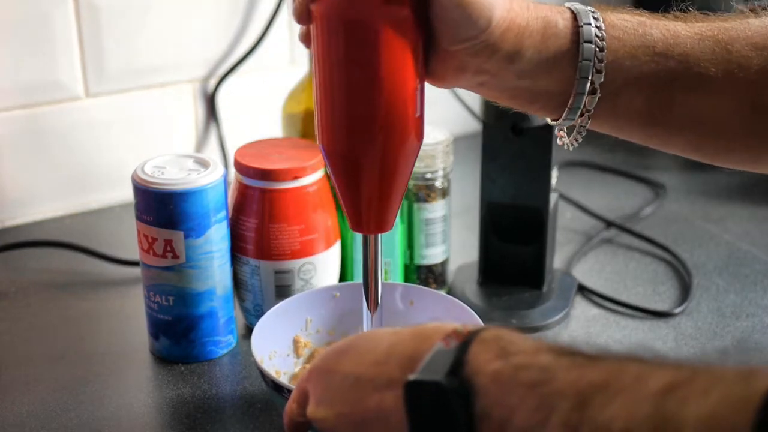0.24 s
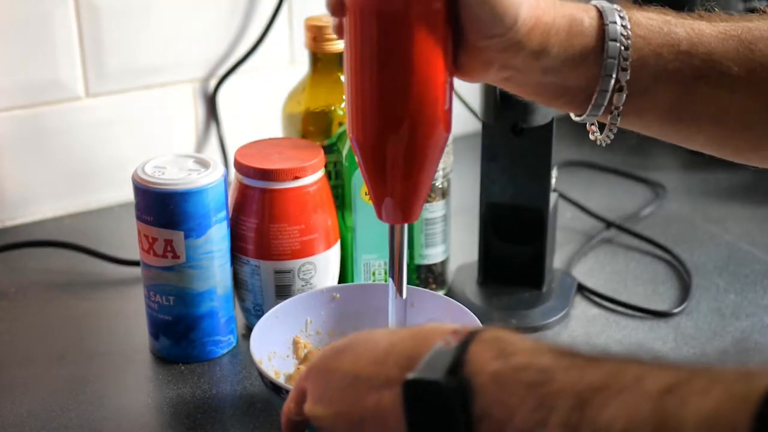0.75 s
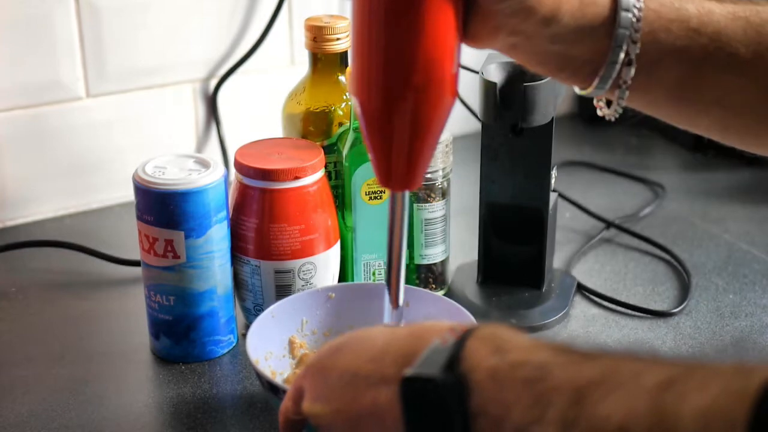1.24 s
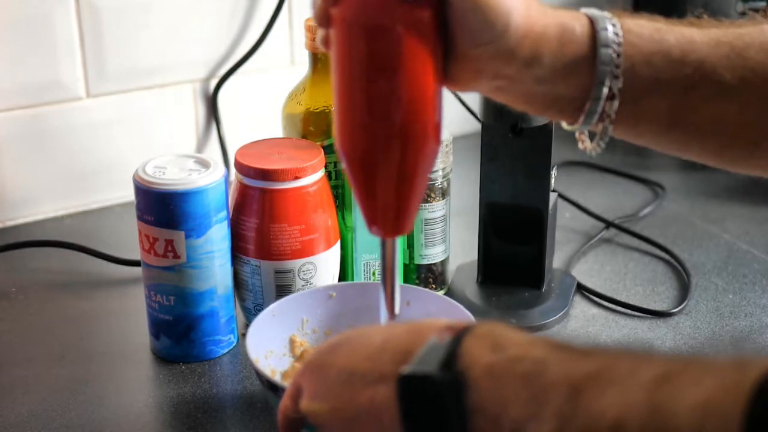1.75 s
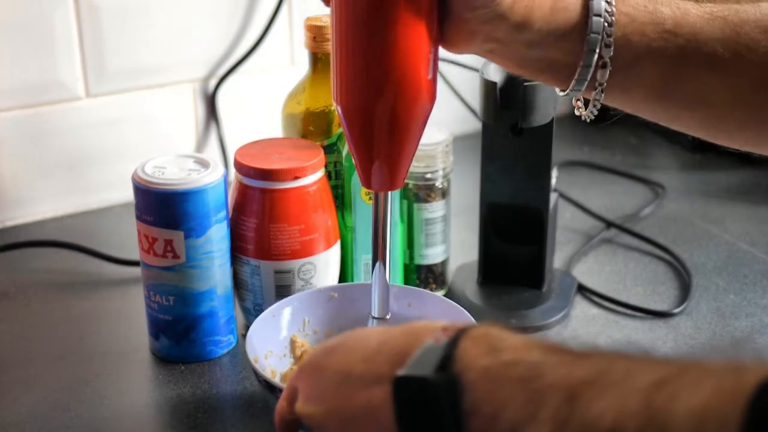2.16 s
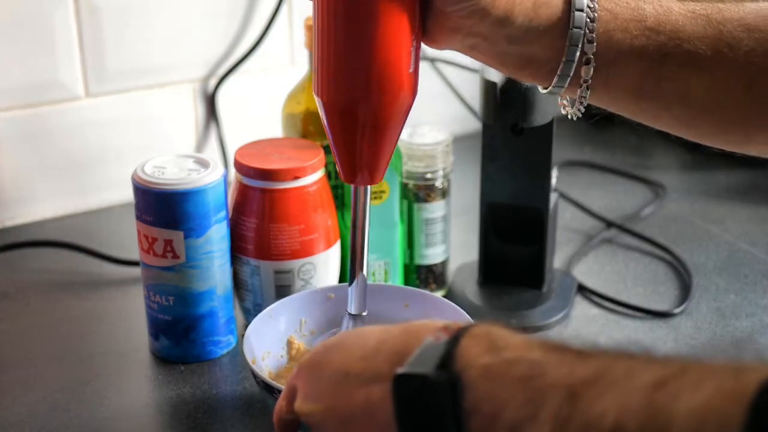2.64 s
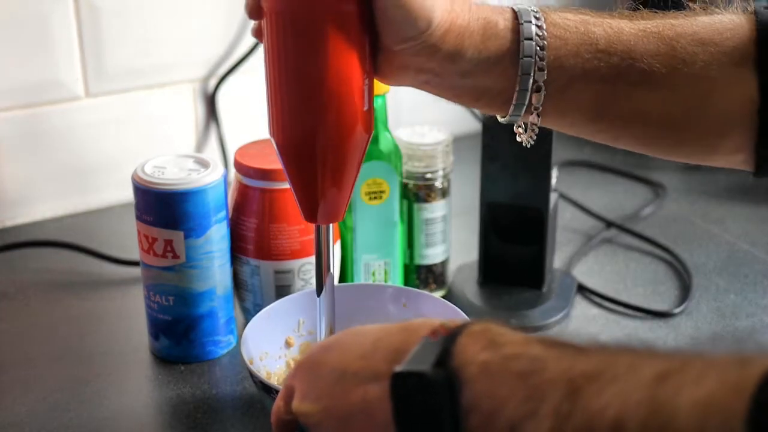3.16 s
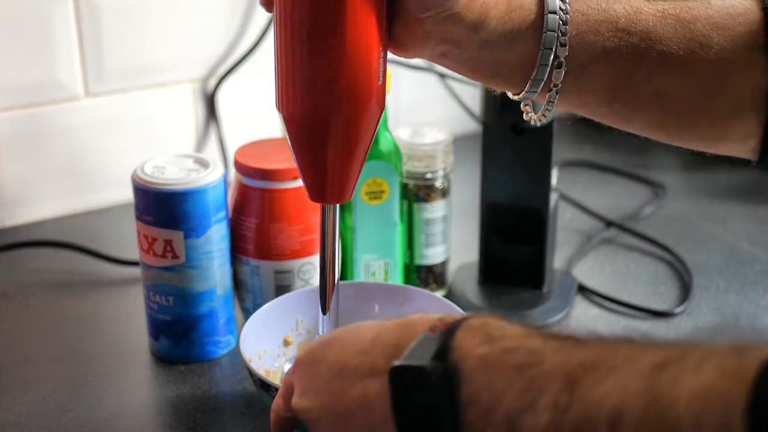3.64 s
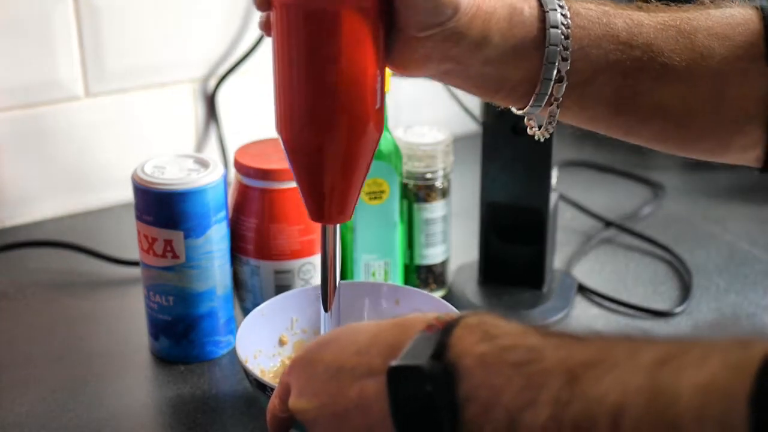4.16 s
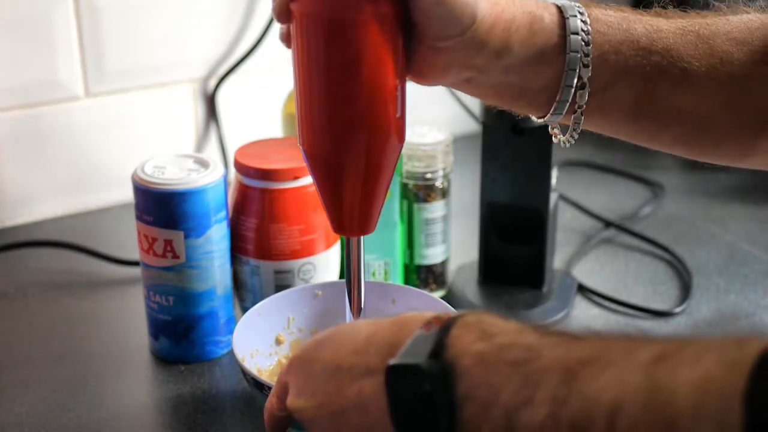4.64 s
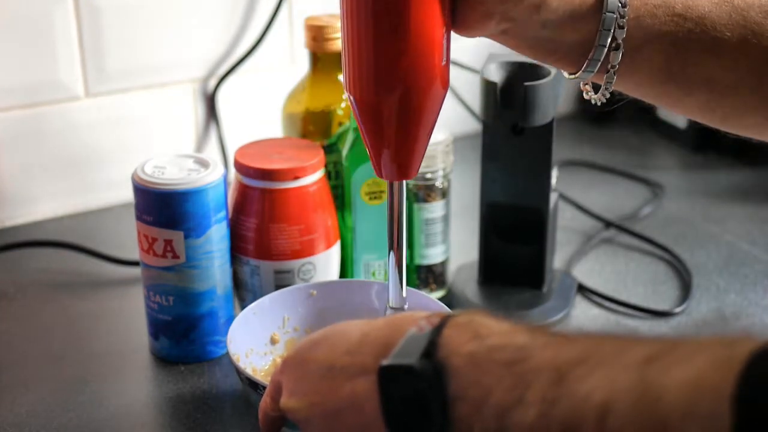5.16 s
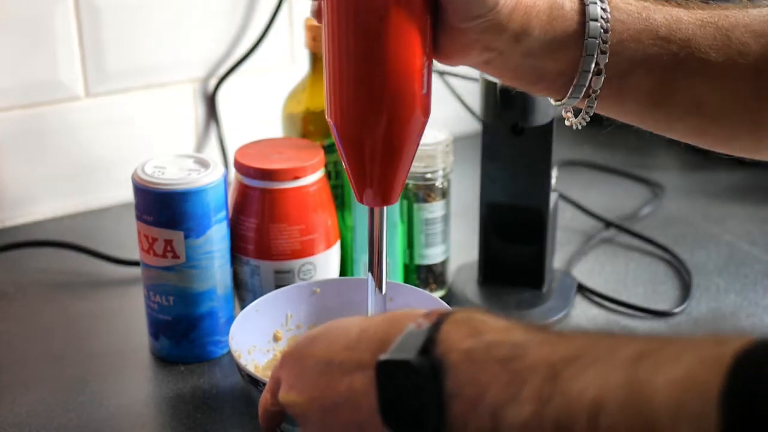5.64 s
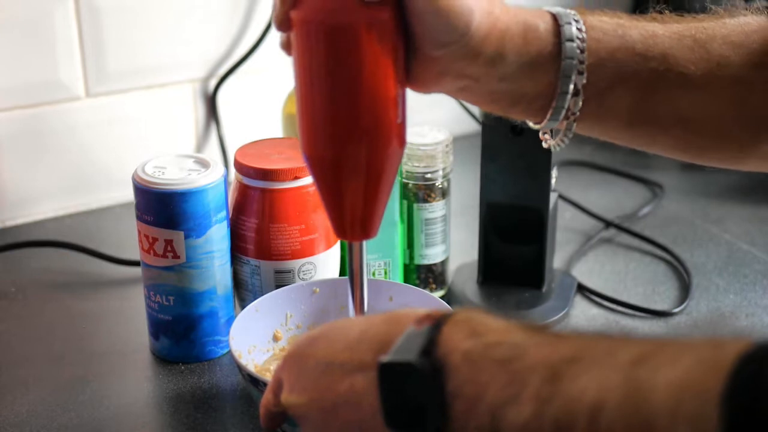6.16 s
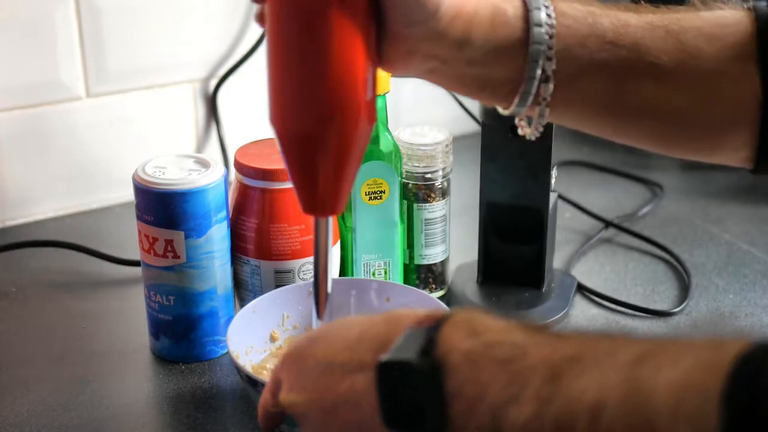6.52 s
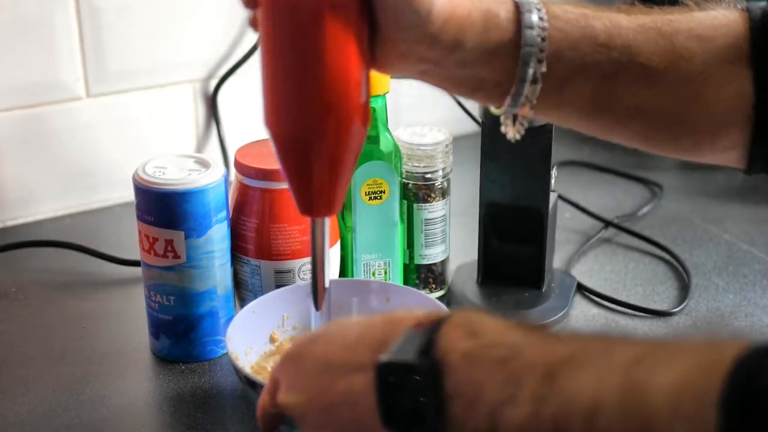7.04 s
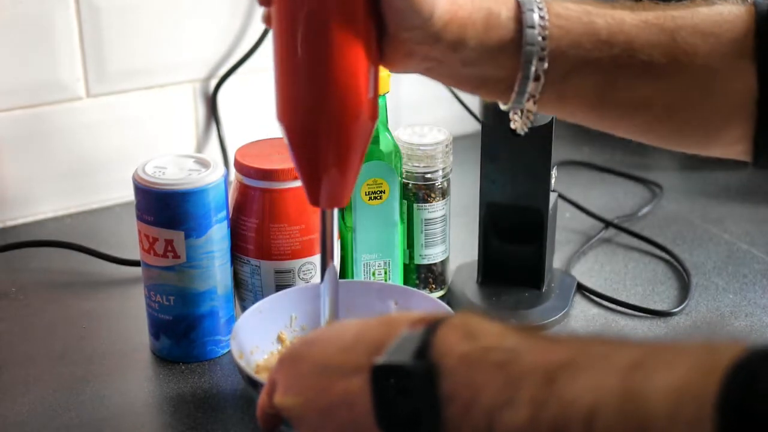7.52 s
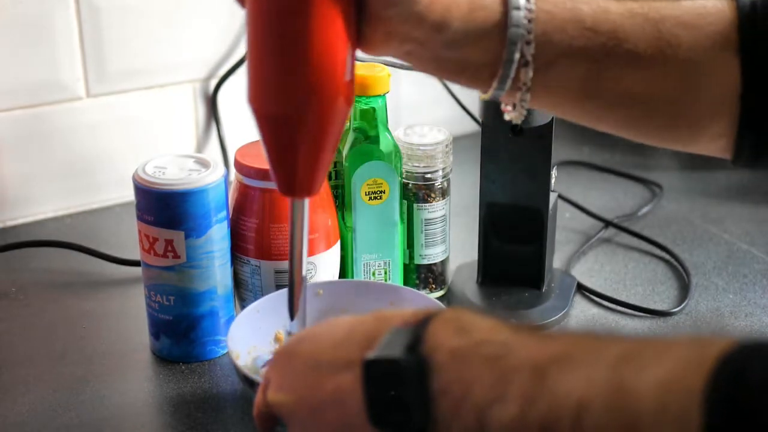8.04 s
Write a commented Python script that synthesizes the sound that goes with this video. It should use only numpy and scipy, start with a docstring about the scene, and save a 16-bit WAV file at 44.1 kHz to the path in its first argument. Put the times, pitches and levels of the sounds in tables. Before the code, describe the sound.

A hand blender's steel foot, motor silent, scrapes and crushes dry crumbs round a bowl in rhythmic strokes, with hollow knocks and judders.

```python
"""A tiled kitchen, ringing briefly: a hand blender's steel foot is worked round a bowl of dry crumbs.
About one stroke every three quarters of a second. Pressed down it crushes crumbs and makes the bowl judder;
eased off it slides with a bright rasp. Friction is random grains over smooth noise, coloured by the bowl.
Wall knocks, worktop thuds and snapping crumbs are clicks with noise tails; knocks also ring decaying sines.
Now and then the rub sings: a gliding narrow-band tone."""
import sys
import numpy as np
from scipy import signal
from scipy.fft import rfft, irfft
from scipy.io import wavfile
from scipy.ndimage import uniform_filter1d

SR = 44100
rng = np.random.default_rng(int(sys.argv[2]) if len(sys.argv) > 2 else 0)


def generate_wav(signal):
    """Clip the signal to [-1, 1] and save it as 16-bit WAV at the path in sys.argv[1]."""
    frames = np.transpose(np.atleast_2d(signal))
    scaled = np.clip(frames, -1, 1) * 32767
    pcm = np.round(scaled).astype(np.int16)
    wavfile.write(sys.argv[1], SR, pcm)


N = 365148


def from_db(db):
    """Decibels to amplitude gain."""
    return np.exp(np.log(10) / 20 * np.asarray(db))


def rms_one(x):
    """Scale a signal to unit power."""
    return x / np.sqrt(np.mean(x ** 2) + 1e-20)


def in_time(power):
    """Power per millisecond to dB per sample."""
    return np.interp(np.arange(N) / SR, np.arange(len(power)) * .001, 10 * np.log10(power + 1e-12))


def at_hz(points, hz):
    """Interpolate a curve on a log-frequency axis."""
    point_hz, value = np.transpose(points)
    return np.interp(np.log(hz), np.log(point_hz), value)


def drift(rate_hz, count=N):
    """Slow random signal of unit rms: two-pole lowpassed noise, computed every 40 samples."""
    step, settle = 40, 2000
    pole = np.exp(-2 * np.pi * rate_hz * step / SR)
    noise = rng.standard_normal(count // step + settle + 2)
    slow = signal.lfilter([1], [1, -2 * pole, pole ** 2], noise)[settle:]
    return np.interp(np.arange(count) / step, np.arange(len(slow)), rms_one(slow))


def through(x, response):
    """Convolve a signal with an impulse response."""
    return signal.oaconvolve(x, response)[:N]


# resonances of bowl, shaft and worktop, before the local mean is removed: centre_hz, width_hz, lift_db
BODY_MODES = [(165, 38, 5), (235.7, 19.6, 9), (381.5, 46, 7.5), (503, 190, 5), (583, 90, 5),
              (613, 9.9, 6.5), (642, 2.9, 11.5), (739.5, 66, 8.5), (856, 32, 7.5), (933, 21, 10),
              (1023, 93, 7.5), (1065, 11, 8), (1137, 31, 5), (1226, 9.4, 11), (1221.6, 10.3, -14.5),
              (1367, 17, 0.5), (1445, 9.8, 3), (1687, 44, 7), (1828, 41, 8.5), (2000, 540, 28),
              (2410, 11.3, -13), (2800, 43, -2.5), (2820, 18, 8.5), (4050, 26.2, 2.5), (3940, 82, 6),
              (4250, 45, 5)]


def bowl_response(spectrum):
    """Minimum-phase, unit-energy response: a broad colour with steep ends, carved by the bowl's resonances."""
    size = 2 ** 13
    hz = np.maximum(np.arange(size // 2 + 1) * SR / size, 1)
    lift_db = sum(db / (1 + (2 * (hz - f) / width) ** 2) for f, width, db in BODY_MODES)
    lift_db = lift_db - uniform_filter1d(lift_db, size=71)  # valleys between peaks
    octaves_below = np.maximum(np.log2(spectrum[0][0] / hz), 0)
    octaves_above = np.maximum(np.log2(hz / spectrum[-1][0]), 0)
    end_loss_db = 18 * np.minimum(octaves_below + octaves_above, 3)
    level_db = at_hz(spectrum, hz) + lift_db - end_loss_db
    # folding the cepstrum makes the response causal
    cepstrum = irfft(np.log(from_db(level_db)))
    cepstrum[1:size // 2] *= 2
    cepstrum[size // 2 + 1:] = 0
    response = irfft(np.exp(rfft(cepstrum)))
    return response / np.linalg.norm(response)


# relative colour of the room tone: freq_hz, density_db_per_hz
ROOM_COLOUR = [(18, -42), (30, 3), (288, -13), (472, -34), (1520, -24), (1690, -36), (3230, -15),
               (7830, -15), (15000, -16)]


def room_tone():
    """Quiet of the kitchen: steady coloured noise, independent in mid and side."""
    level_db = -68.5
    response = bowl_response(ROOM_COLOUR)
    noise = rng.standard_normal((2, N))
    return from_db(level_db) * np.array([through(part, response) for part in noise])


def dying_noise(t60_s):
    """Dense reflections of unit energy that build up within a few milliseconds, then decay."""
    t = np.arange(SR // 2) / SR
    tail = rng.standard_normal(len(t)) * from_db(-60 * t / t60_s) * (1 - np.exp(-t / 0.0021))
    return tail / np.linalg.norm(tail)


def blows(rows, spectrum, rattle_db, rattle_t60_s, room_db):
    """Mid and side of contacts: a click, near reflections and the room, lowpassed if the contact is soft."""
    kitchen_t60_s = 0.39
    response = bowl_response(spectrum)
    force = np.zeros((2, N + SR))
    for start_s, level_db, *dull_hz in rows:
        hit = np.array([from_db(rattle_db) * dying_noise(rattle_t60_s)
                        + from_db(room_db) * dying_noise(kitchen_t60_s) for _ in range(2)])
        hit[0, 0] += 1  # click, mid only
        if dull_hz:
            lowpass = signal.butter(2, min(dull_hz[0], SR / 3), fs=SR, output="sos")
            hit = signal.sosfilt(lowpass, hit)
        at = round(start_s * SR)
        force[:, at:at + hit.shape[1]] += from_db(level_db) * hit
    peak_one = response / np.abs(response).max()
    return np.array([through(part, peak_one) for part in force])


# bowl rocking on the worktop: start_s, level_db
THUD_EVENTS = [(.450, -34.5), (2.378, -16.5), (3.119, -10.5), (3.135, -21.5), (5.447, -10), (5.501, -13.5),
               (6.108, -16.5), (7.585, -6), (7.642, -11), (7.656, -9)]
# relative colour: freq_hz, density_db_per_hz
THUD_COLOUR = [(60, -23), (110, -19.5), (170, -3), (240, -5), (380, -8.5), (700, -29)]


def thuds():
    """The bowl rocks on the worktop: low-coloured blows."""
    return blows(THUD_EVENTS, THUD_COLOUR, rattle_db=-1, rattle_t60_s=0.21, room_db=-6.0)


# hard crumbs snapping: start_s, level_db
SNAP_EVENTS = [(3.8457, -21), (3.8812, -1.5), (3.8875, 0), (7.9005, -6.5)]
# relative colour: freq_hz, density_db_per_hz
SNAP_COLOUR = [(150, 10), (600, 2), (2000, 8.5), (4000, -0.5), (8000, -3), (13000, -18), (15500, -26)]


def snaps():
    """Hard crumbs snap: bright, undulled blows."""
    return blows(SNAP_EVENTS, SNAP_COLOUR, rattle_db=-0.5, rattle_t60_s=0.023, room_db=-1.5)


# foot against bowl wall: start_s, level_db (relative), dull_above_hz, ring_db (against level_db)
WALL_KNOCKS = [(0.443, -1.5, 1900, -35), (1.081, -9, 980, -20), (1.3861, -17, 670, -34),
               (1.509, -28, 2860, -20), (1.53, -17, 1970, -28), (2.6449, -2.5, 1595, -25.5),
               (2.898, -22.5, 460, -27), (2.983, -21, 1790, -30), (3.3803, -3.5, 1510, -24.5),
               (3.825, -28, 2200, -24), (3.8451, -18, 4540, -34), (4.44, -47, 3550, -22),
               (4.545, -25, 3050, -30), (5.19, -11.5, 860, -27), (5.342, -18, 2530, -28),
               (5.97, -11, 482, -30), (6.057, -28, 1424, -27), (6.791, -7, 1470, -34),
               (7.390, -4.5, 650, -31), (7.535, -13.5, 1520, -34), (7.8996, -1, 2510, -23),
               (8.088, -18, 630, -31), (8.252, -5.5, 1860, -31)]


def wall_contacts():
    """Each knock and one weaker rebound, the later the softer the knock; columns of WALL_KNOCKS."""
    delay_s, delay_at_hz, delay_power, rebound_db = .009, 986, 0.568, -6.5
    contacts = list(WALL_KNOCKS)
    for start_s, level_db, dull_hz, ring_db in WALL_KNOCKS:
        rebound_s = start_s + delay_s * (delay_at_hz / dull_hz) ** delay_power
        contacts.append((rebound_s, level_db + rebound_db, dull_hz, ring_db))
    return contacts


# modes of the struck bowl: mode_hz, level_db (mean, before dulling), t60_s
RING_MODES = [(368.4, -8, 0.21), (680, -5, 0.4), (747, 3, 0.25), (914, -5.5, 0.54), (1097, -3, 0.55),
              (1010, -9, 0.33), (1150, -0.5, 0.57), (1430, -12, 0.47), (1610, -19, 0.24), (2134, -33, 0.12)]


def blow_ring(dull_hz):
    """Decaying sines of random phase and varied strength; a soft blow spares the high modes."""
    t = np.arange(SR // 2) / SR
    ring = np.zeros(len(t))
    for hz, level_db, t60_s in RING_MODES:
        envelope = from_db(level_db + 0.74 * rng.standard_normal() - 60 * t / t60_s)
        tone = np.sin(2 * np.pi * hz * t + rng.uniform(0, 2 * np.pi))
        ring += envelope * tone / np.hypot(1, (hz / dull_hz) ** 2)
    return ring


def bowl_ring(contacts):
    """The bowl sings on after each contact, more or less damped by the hand that holds it; mid only."""
    out = np.zeros((2, N + SR))
    for start_s, level_db, dull_hz, ring_db in contacts:
        at = round(start_s * SR)
        out[0, at:at + SR // 2] += from_db(level_db + ring_db) * blow_ring(dull_hz)
    return out[:, :N]


# relative colour: freq_hz, density_db_per_hz
KNOCK_COLOUR = [(70, -26.5), (150, -12), (240, -6.5), (420, -3), (700, -2), (1080, 0.5), (1500, 0),
                (2100, -5), (3000, -11), (5000, -13), (10000, -9.5), (15000, -18.5)]


def knocks():
    """The foot knocks on the bowl's wall: dulled blows plus the ringing modes."""
    contacts = wall_contacts()
    # the blow columns are dull_above_hz and an unused ring_db
    hits = blows(contacts, KNOCK_COLOUR, rattle_db=2.5, rattle_t60_s=0.017, room_db=4.0)
    return from_db(6.0) * hits + bowl_ring(contacts)


# rub locked on one resonance: start_s, length_s, first_hz, last_hz, width_hz, level_db (before fades)
SINGING_TONES = [(0.077, 0.18, 572, 651, 35, -26), (0.253, 0.13, 661, 518, 23, -36),
                 (0.213, .04, 2660, 2670, 73, -28), (0.238, 0.16, 2740, 2550, 50, -36),
                 (0.796, 0.43, 4320, 4140, 280, -37), (1.098, 0.17, 1002, 1103, 220, -34.5),
                 (2.563, 0.057, 664, 610, 66, -39), (3.113, 0.21, 103, 92.5, 5, -36.5),
                 (3.836, 0.056, 2175, 2290, 460, -31), (3.926, 0.11, 92, 84, 15, -42.5),
                 (4.937, 0.3, 720, 578, 170, -44), (5.552, 0.12, 2990, 3660, 1800, -28.5),
                 (5.682, 0.31, 593, 688, 150, -40.5), (6.131, 0.106, 943, 1177, 310, -24),
                 (6.224, 0.073, 2850, 3020, 560, -28), (6.356, 0.163, 4440, 4200, 490, -36),
                 (6.429, 0.22, 1187, 1515, 550, -30.5), (6.472, 0.21, 720, 591, 76, -34),
                 (6.875, 0.16, 3300, 2960, 2300, -28.5), (7.037, 0.19, 4000, 4530, 640, -36.5)]


def singing():
    """Stick-slip locks onto one resonance that glides as the contact moves: a rough tone, mid only."""
    out = np.zeros((2, N + SR))
    for start_s, length_s, first_hz, last_hz, width_hz, level_db in SINGING_TONES:
        count, at = int(length_s * SR), round(start_s * SR)
        phase = 2 * np.pi * np.cumsum(np.geomspace(first_hz, last_hz, count)) / SR
        in_phase = drift(width_hz / 2, count) * np.cos(phase)
        quadrature = drift(width_hz / 2, count) * np.sin(phase)
        fade = signal.windows.tukey(count, .6)
        out[0, at:at + count] += from_db(level_db) * rms_one(in_phase + quadrature) * fade
    return out[:, :N]


def swell(start_s, rise_s, hold_s, level_db, release_db_per_s, sag_db_per_s=0):
    """Power of one gesture per millisecond: rises, holds or sags, eases off, dies faster once lifted out."""
    rise_power, ease_s, lift_db_per_s = 0.94, 0.31, 164
    t = np.arange(0, N / SR, .001) - start_s
    held_s = np.clip(t - rise_s, 0, hold_s)
    after_s = np.maximum(t - rise_s - hold_s, 0)
    lifted_s = np.maximum(after_s - ease_s, 0)
    attack = np.clip(t / rise_s, 0, 1) ** rise_power
    loss_db = sag_db_per_s * held_s + release_db_per_s * after_s + lift_db_per_s * lifted_s
    return (attack * from_db(level_db - loss_db)) ** 2


# sweeps round the bowl: start_s, rise_s, hold_s, slide_db, sag_db_per_s, ease_db_per_s,
# dust_db (against the sliding with its swing reduced)
SWEEP_STROKES = [(-.02, 0.017, 0.49, -22.5, 19.5, 65, -10), (0.644, 0.092, 0.3, -27.5, -2.5, 63, -11.5),
                 (1.509, 0.054, 0.39, -21, 20.5, 119, -13.5), (2.182, 0.055, 0.25, -24.5, 11, 67, -12),
                 (2.803, 0.031, 0.17, -48, 2, 100, -20), (2.971, 0.074, 0.32, -24.5, 31.5, 137, -14.5),
                 (3.819, 0.099, 0.21, -25, -8, 140, -15.5), (4.533, 0.095, 0.37, -22, 20.5, 99, -15.5),
                 (5.325, 0.036, 0.39, -25.5, 11, 103, -13.5), (6.052, 0.029, 0.21, -30, -14, 90, -16),
                 (6.35, 0.11, .10, -29.5, 11, 118, -26), (6.773, 0.12, 0.46, -25, 29, 110, -14),
                 (7.47, 0.26, 0.12, -28.5, 15, 111, -13), (8.148, 0.035, 0.2, -30, 25, 110, -11)]


def stroke_powers():
    """Each sweep gathers speed, slows and eases off; gives sliding power and its less swinging dust power."""
    dust_share, usual = 0.65, from_db(-23) ** 2  # dust takes this share of the dB swing about usual
    sweep, dust = 0, 0
    for start_s, rise_s, hold_s, slide_db, sag_db_per_s, ease_db_per_s, dust_db in SWEEP_STROKES:
        stroke = swell(start_s, rise_s, hold_s, slide_db, ease_db_per_s, sag_db_per_s)
        sweep = sweep + stroke
        dust = dust + usual * (stroke / usual) ** dust_share * from_db(dust_db) ** 2
    return sweep, dust


# foot bearing down: start_s, rise_s, hold_s, crush_db, judder_db
DOWN_PRESSES = [(-.02, 0.017, 0.065, -18, -40), (0.51, .05, 0.089, -28.5, -42),
                (0.657, 0.075, 0.093, -16.5, -37), (0.947, 0.028, 0.066, -27, -49),
                (1.24, 0.027, 0.13, -45, -73), (1.507, 0.056, 0.18, -21.5, -34),
                (2.048, .04, 0.087, -41.5, -51), (2.195, 0.065, 0.19, -18, -30.5),
                (2.984, 0.052, 0.15, -18.5, -30), (3.24, 0.015, 0.016, -31.5, -39),
                (3.869, 0.12, 0.089, -19, -29), (4.582, 0.061, 0.05, -20, -37),
                (4.688, 0.036, 0.054, -22, -30), (5.335, 0.056, 0.18, -20, -27.5),
                (5.78, 0.025, 0.1, -50, -47), (6.049, 0.057, 0.15, -18.5, -28),
                (6.437, 0.041, 0.11, -30.5, -42), (6.782, 0.094, .13, -17.5, -28),
                (7.27, 0.026, 0.13, -33.5, -45), (7.519, 0.037, 0.2, -22, -38),
                (8.005, 0.049, 0.15, -36.5, -50), (8.153, 0.098, 0.016, -19.5, -25)]


def press_powers():
    """Bearing down crushes crumbs; the judder builds up a little later. Gives both powers."""
    crush_release_db_per_s, judder_release_db_per_s, judder_lag_s = 132, 117.5, .012
    crush, judder = 0, 0
    for start_s, rise_s, hold_s, crush_db, judder_db in DOWN_PRESSES:
        crush = crush + swell(start_s, rise_s, hold_s, crush_db, crush_release_db_per_s)
        judder = judder + swell(start_s, rise_s + judder_lag_s, hold_s - judder_lag_s, judder_db,
                                judder_release_db_per_s)
    return crush, judder


# patches of fine grit: start_s, rise_s, hold_s, level_db
GRIT_PATCHES = [(-.02, 0.013, 0.027, -29.5), (0.286, 0.038, .01, -29.5), (0.415, 0.032, 0.19, -44.5),
                (1.538, 0.049, 0.0074, -25), (1.735, 0.021, 0.28, -38.5), (2.423, .06, 0.035, -38),
                (3.045, .03, .015, -34.5), (4.542, 0.071, .015, -28), (4.816, 0.024, 0.2, -35.5),
                (5.333, .04, 0.02, -32.5), (5.57, 0.033, .01, -32), (6.234, 0.038, 0.095, -33),
                (6.385, 0.044, 0.15, -34), (6.96, 0.035, 0.044, -33.5), (7.068, 0.035, 0.017, -29),
                (7.191, 0.11, 0.053, -32.5), (7.70, 0.033, 0.028, -35.5)]


def grit_power():
    """The foot runs through fine grit and hisses."""
    return sum(swell(*row, release_db_per_s=153) for row in GRIT_PATCHES)


def friction_levels():
    """Sweeps rasp, presses crush and judder, grit hisses; gives judder, crush, slide, dust levels in dB."""
    light_judder_db, light_crush_db = -25.5, -25  # under a sliding foot, against sweep
    grit_rasp_db = 3.5  # against grit
    handling_db, idle_rub_db = -59.5, -61.5  # bowl in the hand; rub between strokes
    wander_db, wander_hz = 1.01, 3.6  # the hand never pushes quite evenly
    sweep, dust = stroke_powers()
    crush, judder = press_powers()
    grit = grit_power()
    levels_db = np.array([
        in_time(judder + sweep * from_db(light_judder_db) ** 2 + from_db(handling_db) ** 2),
        in_time(crush + sweep * from_db(light_crush_db) ** 2),
        in_time(sweep + grit * from_db(grit_rasp_db) ** 2 + from_db(idle_rub_db) ** 2),
        in_time(dust + grit)])
    return levels_db + wander_db * drift(wander_hz)


def wandering_echoes(x, share, sway_s):
    """Wall echoes come sooner or later as the foot circles, so the colour keeps shifting."""
    n, out = np.arange(N), x
    for lag_s, polarity in zip((.0007, .0013, .0021, .0034), (1, 1, -1, -1)):
        source = n - np.round(SR * (lag_s + sway_s * drift(2.5))).astype(int)
        out = out + share * polarity * x.take(source, mode="clip")
    return out


def friction(level_db, spectrum, grains_per_s, size_db, smooth_db, grip_db, grip_hz, echo):
    """Crumbs break at random over a smooth rub while the foot sticks and slips; gives mid and side."""
    sizes = from_db(size_db * np.minimum(rng.exponential(1, N), 4)) * rng.choice([-1, 1], N)
    grains = rms_one(sizes * (rng.random(N) < grains_per_s / SR))
    rub = from_db(smooth_db) * rng.standard_normal(N)
    grip = from_db(grip_db * drift(grip_hz))
    force = wandering_echoes(grains + rub, echo, sway_s=.00012) * grip
    scattered = rng.standard_normal(N)  # returned by the walls, smoothed, from the sides
    response = bowl_response(spectrum)
    gain = from_db(level_db)
    return np.array([through(rms_one(part) * gain, response) for part in (force, scattered)])


# relative colour: freq_hz, density_db_per_hz
JUDDER_COLOUR = [(45, -19.5), (70, -14.5), (105, -3.5), (160, -1.9), (240, -1.5), (360, 7.5), (550, -20)]


def juddering(level_db):
    """The pressed bowl judders: sparse low grains with strong grip swings."""
    return friction(level_db, JUDDER_COLOUR, grains_per_s=400, size_db=3.0, smooth_db=-4.5,
                    grip_db=3.0, grip_hz=25, echo=0.027)


# relative colour: freq_hz, density_db_per_hz
CRUSH_COLOUR = [(105, -41), (160, -25.5), (240, -7), (360, 1.2), (550, 5), (780, -2.4), (1100, -1.5),
                (1550, -12.5), (2200, -10.5), (3000, -17), (4100, -22), (5500, -36.5), (7500, -36.5)]


def crushing(level_db):
    """Crumbs break under the foot: mid-range grains over a weaker rub."""
    return friction(level_db, CRUSH_COLOUR, grains_per_s=1800, size_db=3.0, smooth_db=-2.5,
                    grip_db=0.7, grip_hz=54.4, echo=0.21)


# relative colour: freq_hz, density_db_per_hz
SLIDE_COLOUR = [(45, -15), (105, -24.5), (360, -12.5), (550, 8.5), (780, -2.5), (1100, 1), (2200, -2.5),
                (3000, -5.5), (4100, -3), (5500, -8.5), (7500, -14), (10000, -31), (12500, -33.5),
                (14800, -54)]


def sliding(level_db):
    """The foot slides with a bright rasp: dense grains and a steady rub."""
    return friction(level_db, SLIDE_COLOUR, grains_per_s=3000, size_db=5.0, smooth_db=1.0,
                    grip_db=0.1, grip_hz=50, echo=0.23)


# relative colour: freq_hz, density_db_per_hz
DUST_COLOUR = [(3000, -0.5), (4100, -25.5), (5500, 3), (7500, -1.5), (10000, -1), (12500, -10),
               (14800, -18.5)]


def dusting(level_db):
    """Dust and grit hiss: very dense treble grains under a stronger rub."""
    return friction(level_db, DUST_COLOUR, grains_per_s=6000, size_db=9.5, smooth_db=5.5,
                    grip_db=1.03, grip_hz=37, echo=0.31)


# left-right likeness: freq_hz, correlation (for equal mid and side)
CHANNEL_LIKENESS = [(60, 0.66), (150, 0.95), (380, 0.96), (950, 0.87), (2380, 0.82), (5980, 0.86),
                    (15000, 0.69)]
# channel balance: freq_hz, left_minus_right_db
CHANNEL_LEAN = [(60, 2), (130, 3.5), (290, 0.5), (640, -1.0), (1410, -3), (3100, -1.0), (6820, 0),
                (15000, 0.5)]
# channel phase, constant below the second point: freq_hz, left_lead_rad
CHANNEL_LEAD = [(0, 0), (260, -0.61), (2500, -0.1), (15600, 0.39), (16000, 0.19)]


def microphones(mid_side):
    """Two close microphones hear nearly the same, each with a slight colour and delay of its own."""
    size = 2 ** 19
    hz = np.maximum(np.arange(size // 2 + 1) * SR / size, 1)
    mid, side = rfft(mid_side, size)
    alike = np.clip(at_hz(CHANNEL_LIKENESS, hz), 0, .999)
    side = side * np.sqrt((1 - alike) / (1 + alike))
    lean = from_db(at_hz(CHANNEL_LEAN, hz) / 2) * np.exp(.5j * at_hz(CHANNEL_LEAD, hz))
    return irfft(np.array([(mid + side) * lean, (mid - side) / lean]), size)[:, :N]


def scene():
    """Kitchen quiet, blows, singing and the four kinds of friction, heard in stereo."""
    judder_db, crush_db, slide_db, dust_db = friction_levels()
    blow_sounds = thuds() + snaps() + knocks()
    rubbing = juddering(judder_db) + crushing(crush_db) + sliding(slide_db) + dusting(dust_db)
    return microphones(room_tone() + blow_sounds + singing() + rubbing)


def record(dry):
    """Round the highest peaks, notch a narrow dip in the microphone's response, cut the top."""
    notch_hz, notch_q, cutoff_hz = 7870, 60, 15600
    rounded = dry / (1 + dry ** 6) ** (1 / 6)
    notched = signal.lfilter(*signal.iirnotch(notch_hz, notch_q, fs=SR), rounded)
    return signal.sosfilt(signal.ellip(10, .1, 90, cutoff_hz, fs=SR, output="sos"), notched)


dry = scene()
out = record(dry)
generate_wav(out)
```